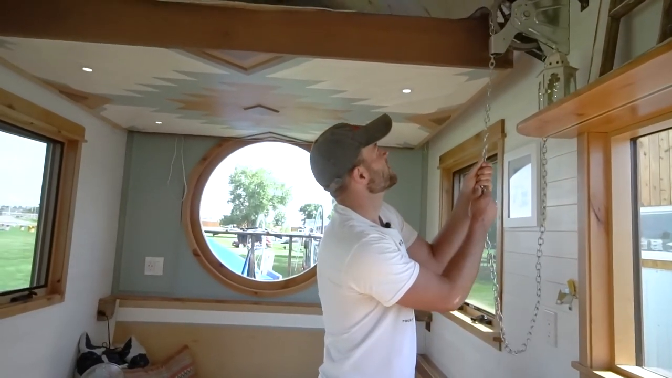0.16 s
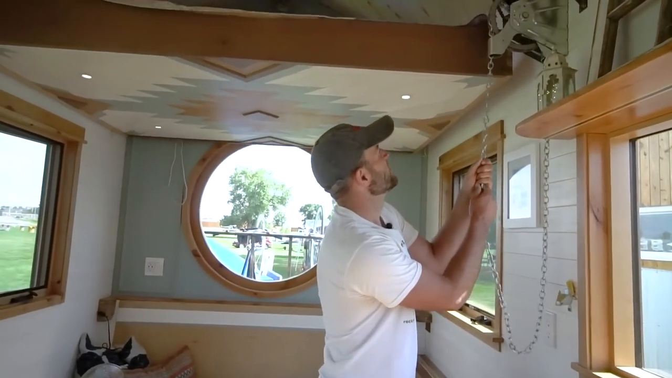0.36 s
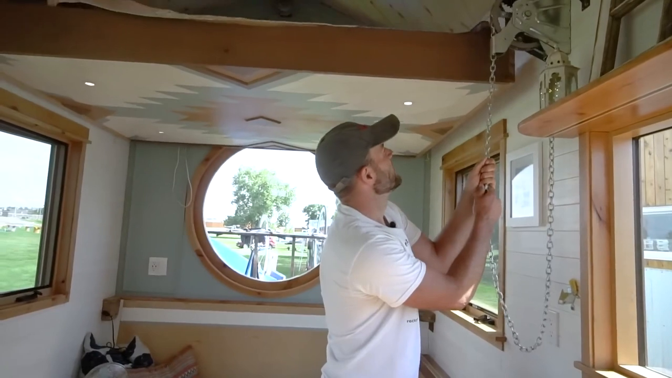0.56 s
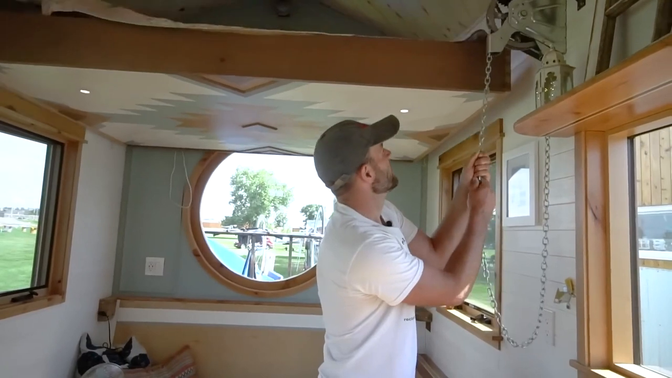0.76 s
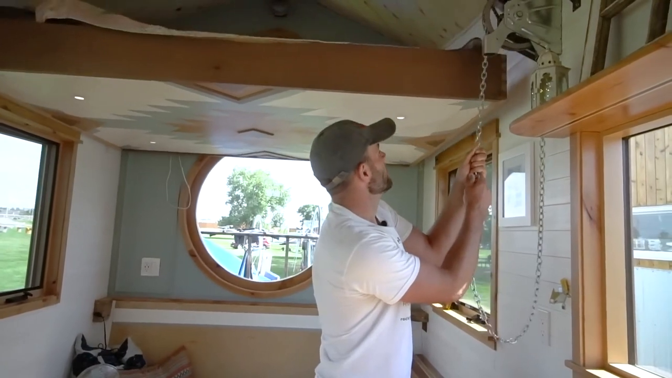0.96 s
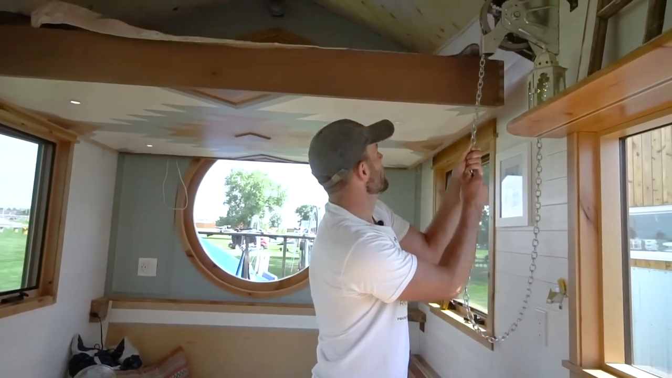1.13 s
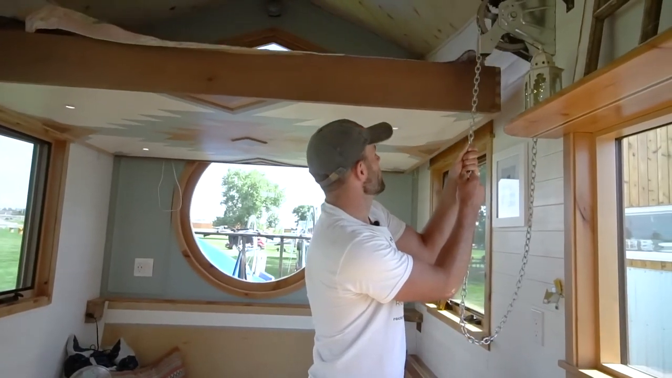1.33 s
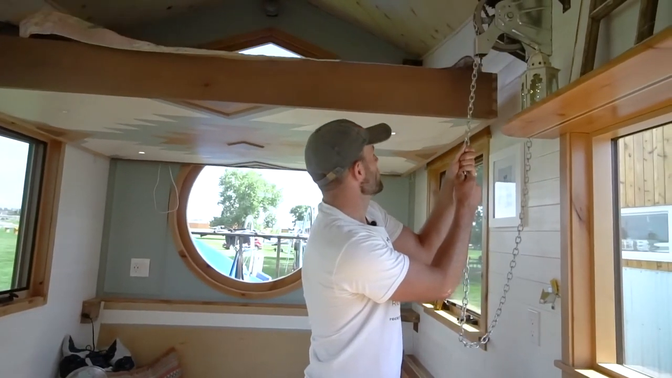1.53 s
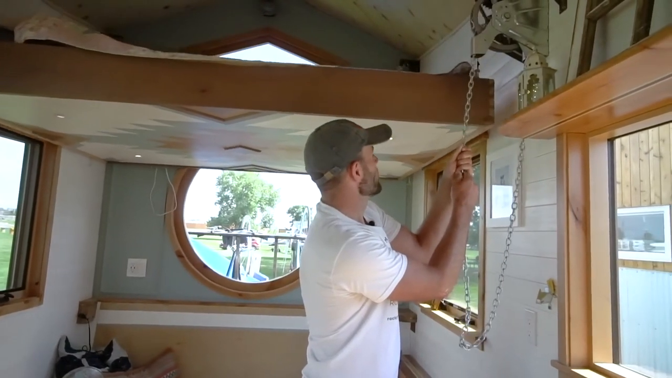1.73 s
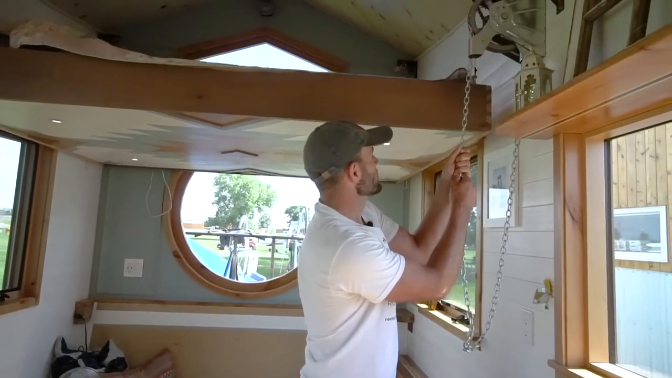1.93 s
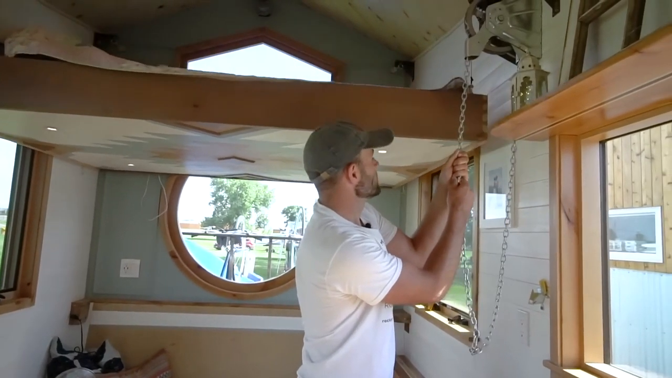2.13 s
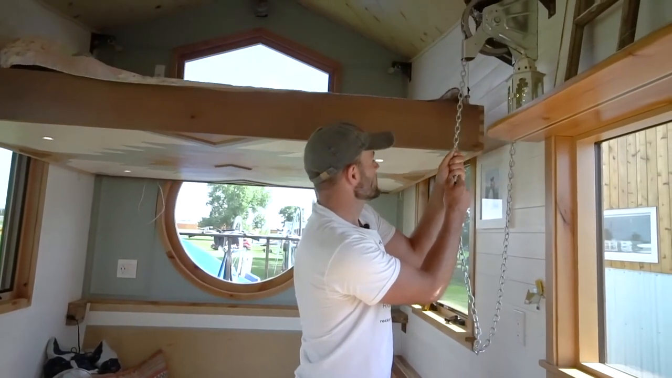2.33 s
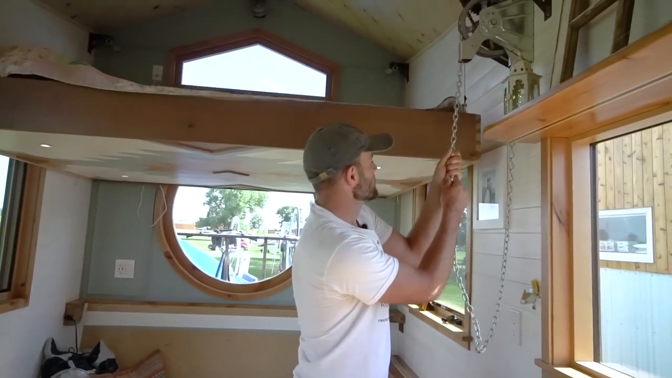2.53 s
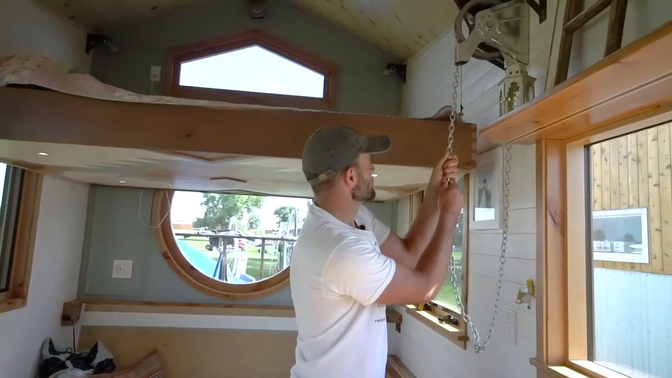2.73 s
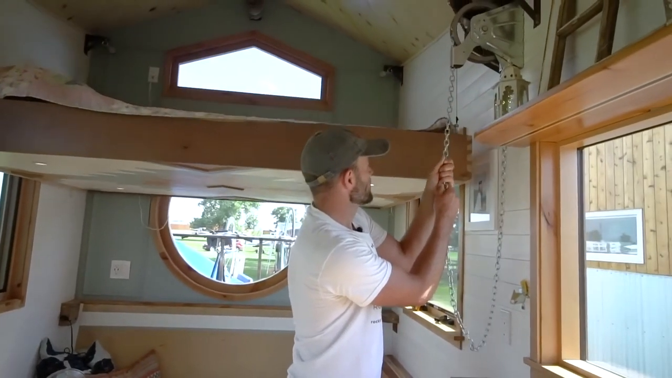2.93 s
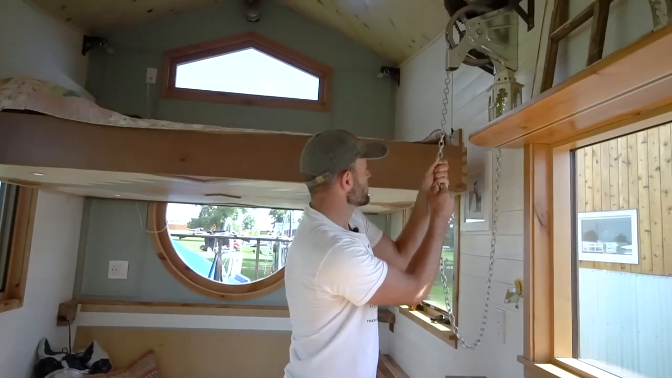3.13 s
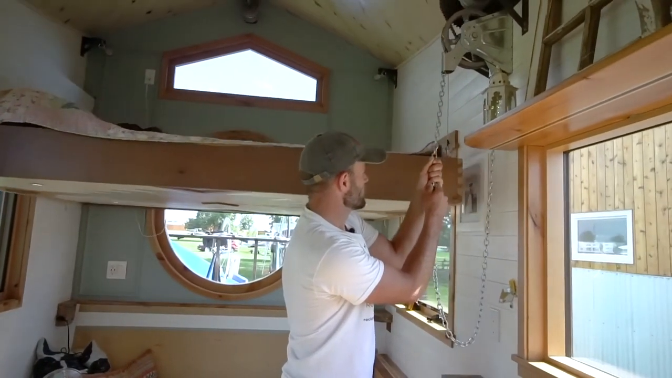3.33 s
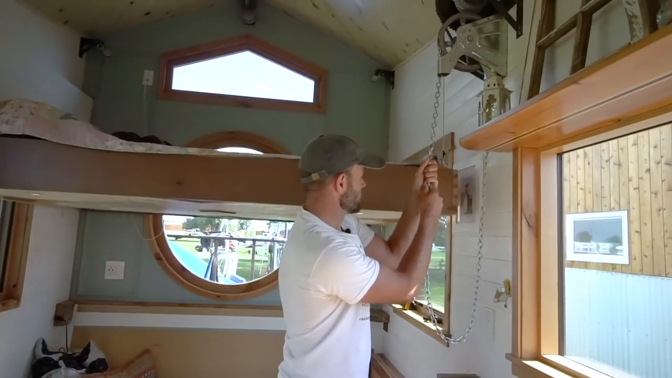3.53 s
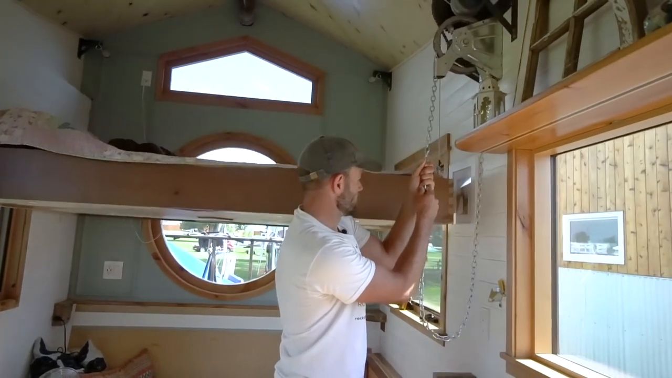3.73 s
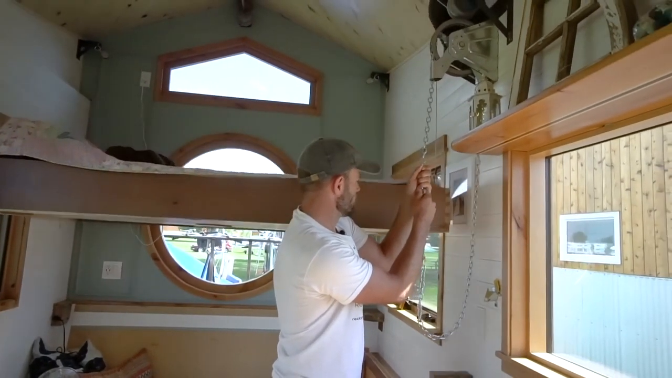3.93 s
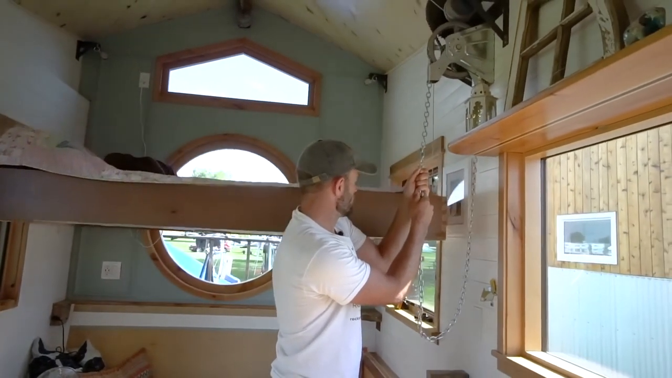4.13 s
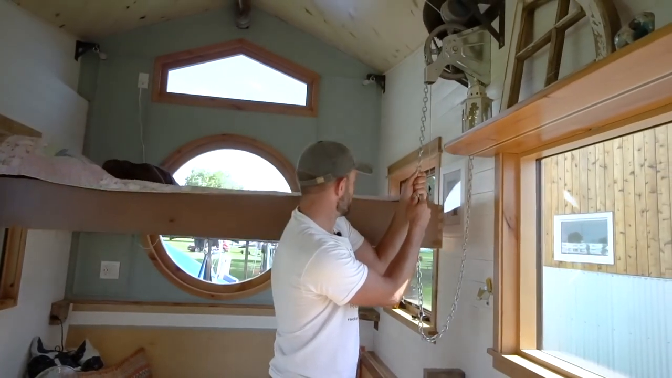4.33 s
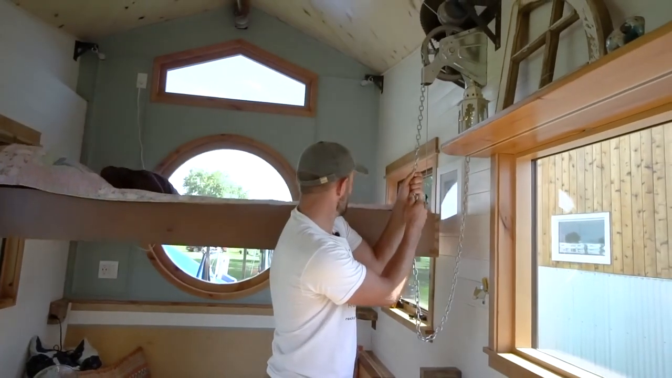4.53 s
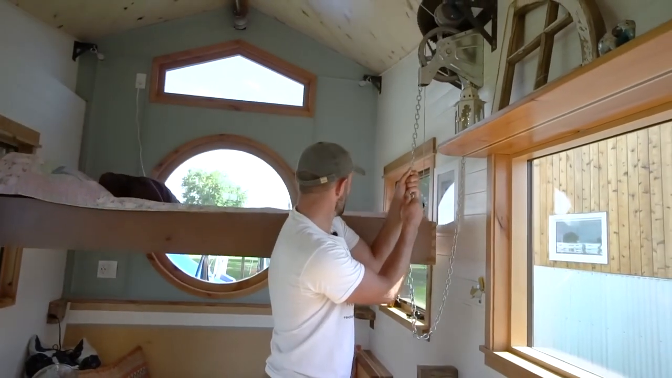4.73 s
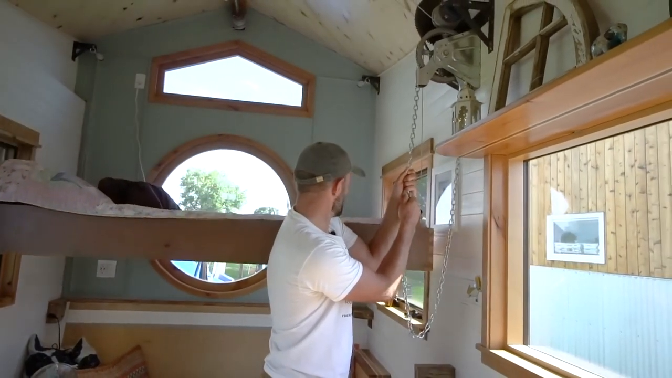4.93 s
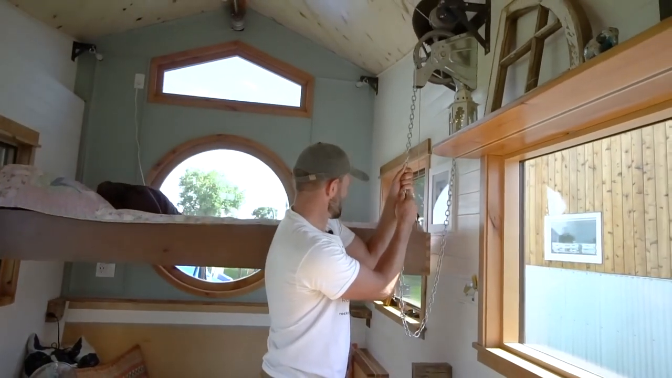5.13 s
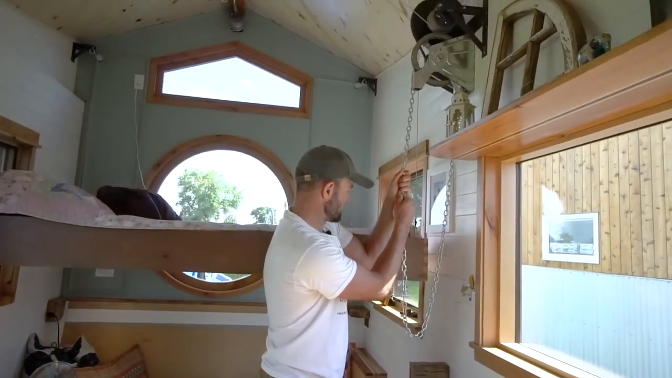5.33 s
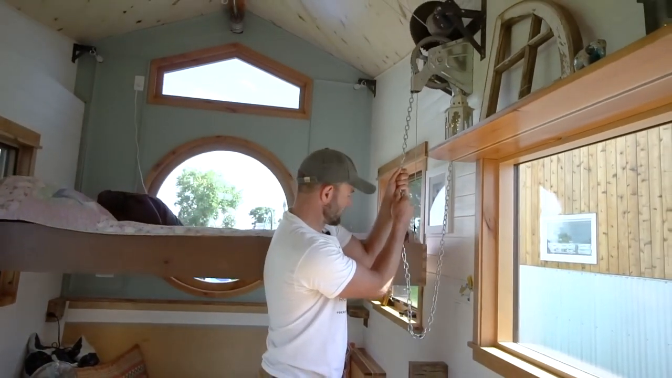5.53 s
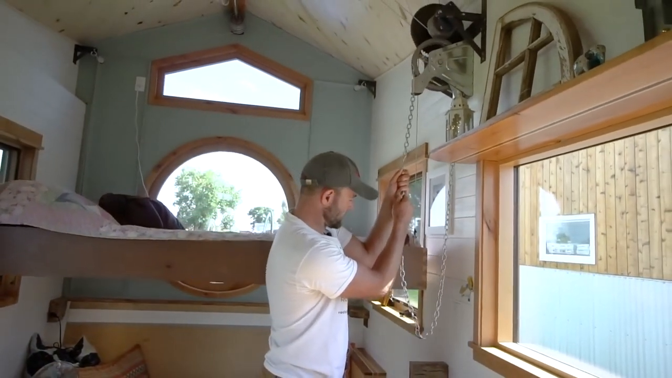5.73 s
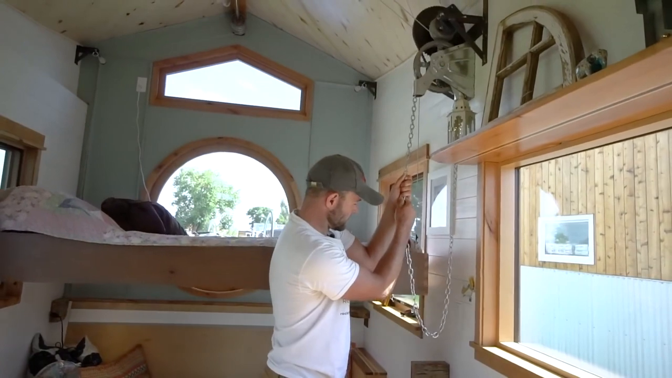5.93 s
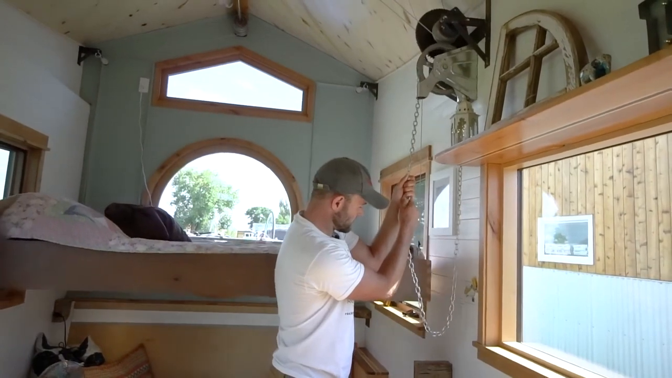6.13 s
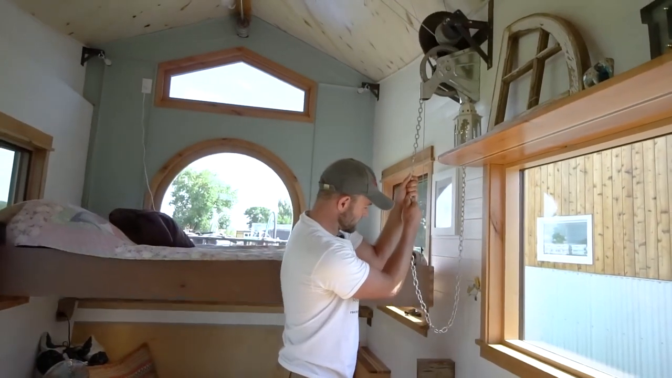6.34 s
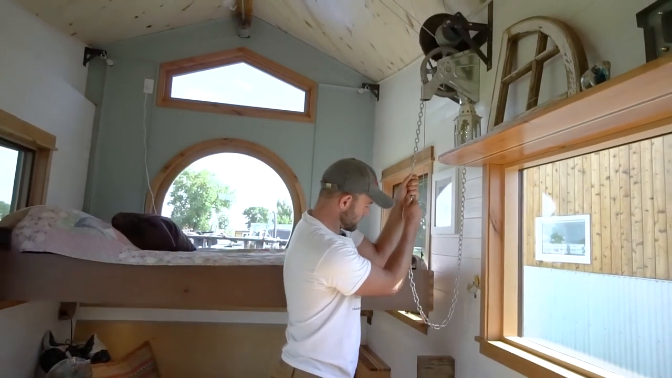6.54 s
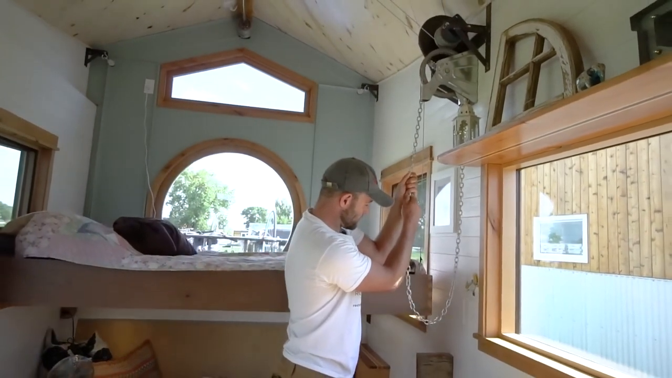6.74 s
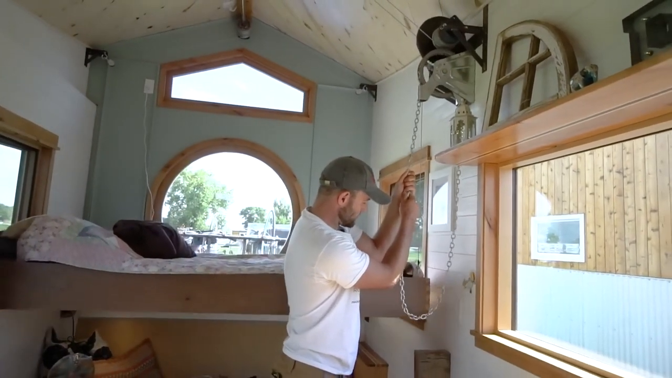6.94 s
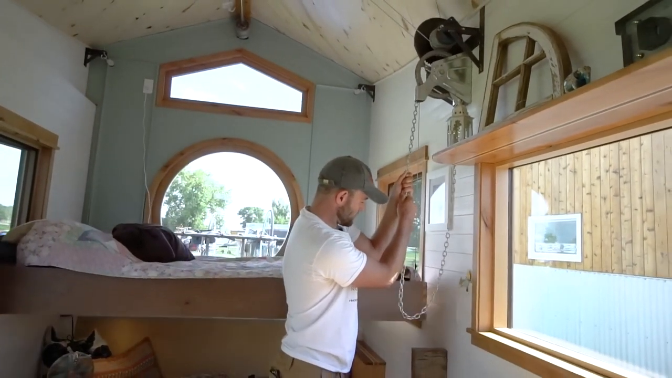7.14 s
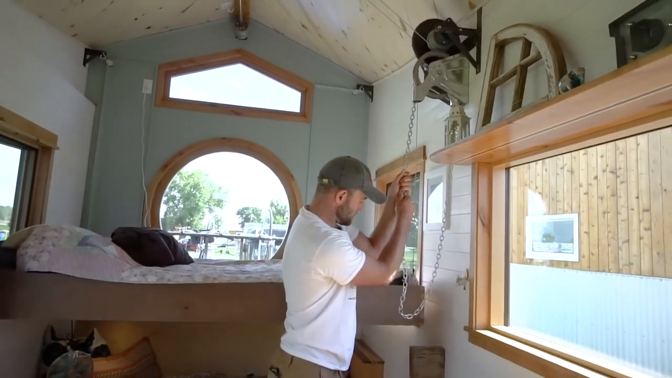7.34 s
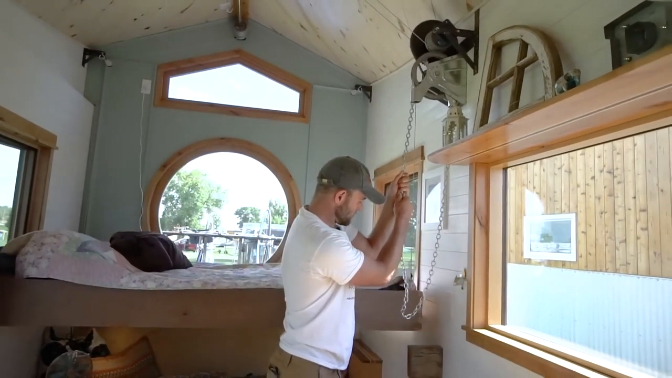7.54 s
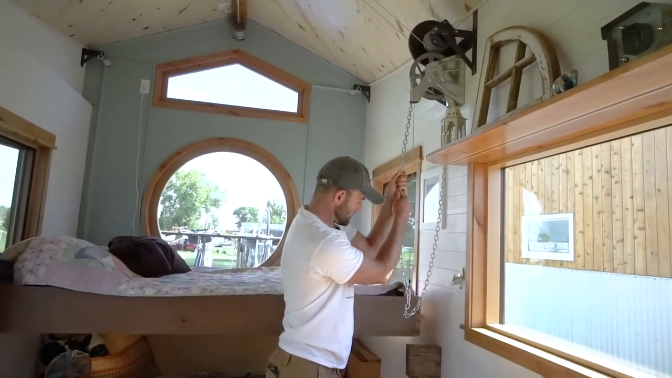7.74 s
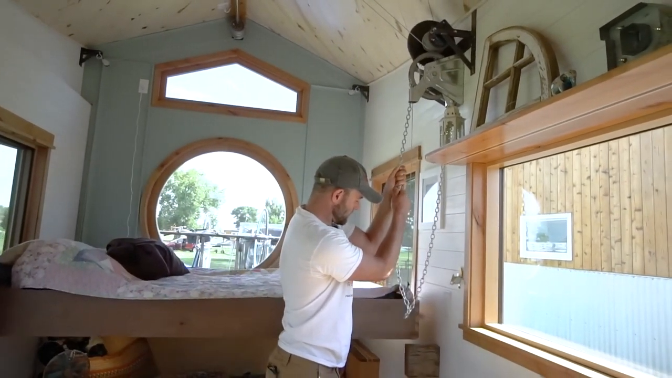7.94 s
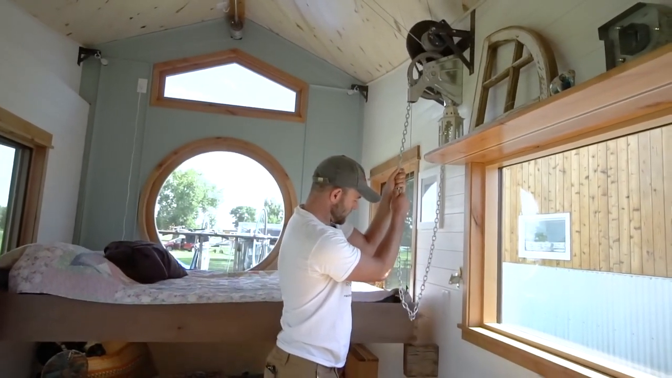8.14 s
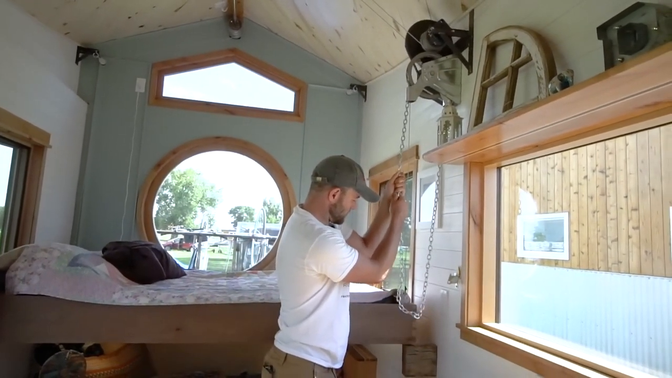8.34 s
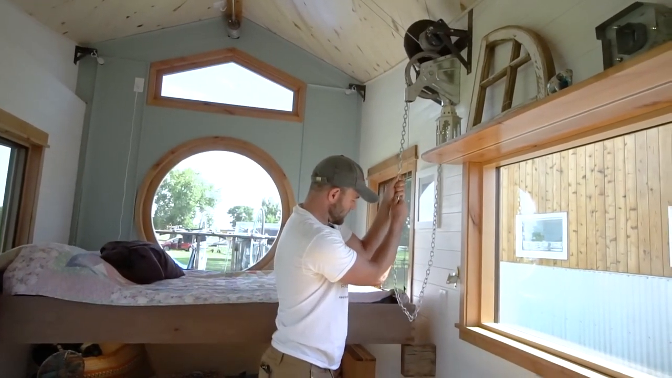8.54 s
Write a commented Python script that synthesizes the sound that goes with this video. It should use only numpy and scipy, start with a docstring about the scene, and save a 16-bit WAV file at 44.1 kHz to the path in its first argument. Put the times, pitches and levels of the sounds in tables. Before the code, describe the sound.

Close, bright metallic ticking of a pawl over a ratchet wheel, quick and uneven, with ringing steel plates and light chain jangle. The pace rises, dips, and rises again. After about four seconds loose chain links rattle densely and dominate, over a low-mid gear drone. The pulling stays continuous but pulses hand over hand. A soft thud precedes the abrupt stop and a short reverberant tail in a small wooden interior.

```python
"""The brake pawl of a hand chain hoist ticks over its ratchet wheel as a heavy load is lowered in a small
wooden room. Each tick is a burst of noise that rings the steel plates and both wheels.
The hand chain clatters with chance knocks, grows much louder midway and covers the ticks; the gear housing
drones from ringing modes. Dull knocks, faint short bursts of deep noise and faint room noise lie beneath.
At the end the hoist stops and the room rings out."""
import sys
import numpy as np
from scipy import signal
from scipy.fft import rfft, irfft, next_fast_len
from scipy.io import wavfile
from scipy.ndimage import uniform_filter1d, minimum_filter1d

SR = 44100
rng = np.random.default_rng(int(sys.argv[2]) if len(sys.argv) > 2 else 0)


def store_pcm(level_fs):
    """Save levels as 16-bit WAV."""
    pcm = np.round(np.clip(level_fs, -1, 1) * 32767).astype(np.int16)
    wavfile.write(sys.argv[1], SR, np.atleast_2d(pcm).T)


N = 382479
TIME = np.arange(N) / SR  # seconds
STOP_S = 8.33  # the hoist stops
# from here the hanging chain starts to swing and clatter, and shakes the housing more
SWING_START_S, SWING_RISE_S = 4.11, 1.3


def pawl(speed, level_db):
    """The pawl slips off each tooth, snaps into the gap and bounces once; the snap rings plates and wheels."""
    # ticks of the slow stretches, heavy or light: (time [s], force [dB])
    slow_ticks = [(0.053, -1), (0.111, -0.5), (0.16, -3), (0.2, -2.5), (0.235, 2.5), (0.263, -2),
                  (0.293, -5), (0.319, 5), (0.345, 0), (0.371, -1.5), (1.798, -3.5), (1.826, 0.5),
                  (1.854, -3), (1.882, -2), (1.911, 2.5), (1.939, 0), (1.966, -1)]
    # dull part of each contact: (frequency [Hz], level per Hz [dB])
    clack_spectrum = [(40, -53), (120, -31), (300, -17), (500, -7.5), (850, -9.5), (1120, -6.5),
                      (1220, -18.5), (1350, -6), (1800, -7), (2400, 0), (3200, -7.5), (4000, -1.5),
                      (5600, -6.5), (7200, -3.5), (7950, -12), (9200, -17.5), (12000, -37.5)]
    # ringing of pawl and steel side plates: (frequency [Hz], width [Hz], level [dB])
    plate_modes = [(1276, 19, -14), (1394, 36, -2), (1476, 20, -7.5), (1656, 29, -15.5), (2250, 240, -9),
                   (2430, 170, -5), (2700, 50, -9.5), (3260, 25, -14), (3843, 62, -0.5), (4345, 45, -2),
                   (4600, 69, -9.5), (4970, 77, -5.5), (5690, 41, -15), (6410, 100, -9), (6860, 98, -2),
                   (6990, 61, 0), (7460, 100, -10), (8720, 67, -3), (10020, 26, -10.5)]
    # bright edge of each tick: (time [s], level [dB])
    edge_curve = [(0, -32), (0.5, -19.5), (1.0, -28), (1.4, -33), (1.9, -25), (2.35, -24), (3.3, -24.5),
                  (4.1, -25.5), (4.8, -35), (5.5, -27), (5.8, -48)]

    teeth_passed = np.floor(np.cumsum(speed) / SR)
    drops = TIME[1:][np.diff(teeth_passed) > 0]
    drops = drops[drops < STOP_S]
    chance = rng.standard_normal((len(drops), 4))
    force_db = 2.37 * chance[:, 0]
    for s, db in slow_ticks:
        nearest = np.argmin(np.abs(drops - s))
        force_db[nearest] = db
    # at speed the pawl has less time to fall, so each tick is lighter
    force = from_db(force_db) / np.sqrt(np.interp(drops, TIME, speed))

    # typical delays after the drop, in seconds; chance varies them
    seats = drops + .0015 * np.exp(.15 * chance[:, 3])
    bounces = drops + .0105 * np.exp(.3 * chance[:, 1])
    bounce_force = force * from_db(-13 + 2.5 * chance[:, 2])
    times = np.r_[drops, seats, bounces]
    sizes = np.r_[force, force * from_db(2), bounce_force]

    clack = coloured(chatter(times, sizes, fade_s=.001), clack_spectrum)
    snap = from_db(-8) * rms_one(band(chatter(seats, force, fade_s=.0004), 1430, 3800))
    plates = from_db(-3) * band(body(seats, force, plate_modes), 780, 8000)

    edge_db, = in_time(edge_curve)
    edge_noise = chatter(np.r_[drops, seats], np.r_[force, force], fade_s=.00055)
    edge = from_db(edge_db) * rms_one(band(edge_noise, 6290, 7660))
    return from_db(level_db) * (clack + snap + plates) + wheels(seats, force) + edge


def wheels(times, sizes):
    """Each snap strikes one mode of each wheel; they ring freely or are damped as the load shifts."""
    # ring of the ratchet wheel: (time [s], level [dB])
    ratchet_curve = [(0, -36), (0.3, -28.5), (1.55, -23), (1.95, -31), (2.25, -24), (2.7, -24.5),
                     (3.2, -20), (3.48, -22), (3.62, -27), (5.2, -32), (5.8, -53)]
    # ring of the hand chain's wheel: (time [s], level [dB])
    chain_wheel_curve = [(0, -29), (0.3, -24), (0.95, -25.5), (1.7, -44), (3.2, -41), (3.9, -23),
                         (5.3, -24), (5.7, -32), (6.5, -25.5), (8.3, -32.5)]
    ratchet_db, = in_time(ratchet_curve)
    chain_wheel_db, = in_time(chain_wheel_curve)
    ratchet = from_db(ratchet_db) * ring(times, sizes, hz=3508, width_hz=67)
    chain_wheel = from_db(chain_wheel_db) * ring(times, sizes, hz=2176, width_hz=80)
    return ratchet + chain_wheel


def hand_chain(speed, level_db, tug_db):
    """Links knock on wheel pockets, guide and each other; until the chain swings, each tooth jolts them."""
    # dull part of each contact: (frequency [Hz], level per Hz [dB])
    clack_spectrum = [(40, -68), (120, -32.5), (300, -17), (480, -10), (850, -11.5), (1100, -4.5),
                      (1450, -5.5), (1800, -3), (2400, -1), (3300, -6), (4300, -5), (5300, -10.5),
                      (7000, -15), (9000, -25), (12000, -43)]
    # ringing of links and chain guide: (frequency [Hz], width [Hz], level [dB])
    link_modes = [(1122, 25, -6), (1273.3, 12, 0), (1353, 23, -4), (1406, 35, -3), (1480, 30, -5.5),
                  (1859, 28, -5.5), (2222, 82, -2), (2376, 45, 0), (2665, 40, -6), (2806, 36, -5.5),
                  (2965, 48, -13), (3150, 20, -11), (3598, 80, 1), (3780, 100, -3), (4324, 31, -2.5),
                  (4480, 62, -6), (5140, 110, -13), (6470, 39, -10.5), (7080, 60, -8), (7640, 23, -12),
                  (8600, 30, -15)]
    jolt_db, jolt_teeth = 7, .22  # strength, and fading time as a share of one tooth
    treble_hz, treble_share = 3500, .83

    times, sizes = random_contacts(8 * speed, spread_db=2.5)  # eight contacts per tooth
    clack = coloured(chatter(times, sizes, fade_s=.001), clack_spectrum)
    ringing = band(body(times, sizes, link_modes), 1030, 9900)
    links = clack + from_db(-4) * ringing

    since_tooth = np.cumsum(speed) / SR % 1
    jolt = np.exp(-since_tooth / jolt_teeth) - jolt_teeth
    links = links * from_db(jolt_db * jolt * (1 - swing()))

    # harder knocks are brighter: the treble takes an extra share of each tug
    dull = signal.sosfilt(signal.butter(1, treble_hz, fs=SR, output="sos"), links)
    treble = from_db(treble_share * tug_db) * (links - dull)
    return from_db(level_db) * (dull + treble) + jangles(links)


def jangles(links):
    """Loose links jangle for a moment: one frequency band of the link sound swells and fades each time."""
    # moments of jangling: (middle [s], length [s], level [dB], centre frequency [Hz])
    jangle_moments = [(0.31, 0.59, -31.5, 1900), (0.802, 1.5, -34, 3840), (1.293, 0.67, -30, 2680),
                      (1.656, 0.25, -27, 2710), (2.2, 1, -33, 2600), (3.897, 1.2, -38, 1140),
                      (4.558, 0.36, -24.5, 4400), (4.953, 0.77, -25.5, 4540)]
    half = 2 ** (.69 / 2)  # each band is 0.69 octave wide
    total = 0
    for s, length_s, db, hz in jangle_moments:
        register = rms_one(band(links, hz / half, hz * half))
        total = total + from_db(db) * swell(s, length_s) * register
    return total


def housing(speed):
    """Gear teeth knock under the load and keep the housing's modes droning."""
    # ringing of the gear housing: (frequency [Hz], width [Hz], level [dB])
    housing_modes = [(332.6, 21, -15), (434, 28, -12.5), (478, 25, -15.5), (527.8, 12, -1.5),
                     (560, 23, -0.5), (585.5, 20, -2), (639, 15, -2.5)]
    times, sizes = random_contacts(5 * speed, spread_db=1.5)  # five contacts per tooth
    return rms_one(band(body(times, sizes, housing_modes), 194, 910))


def load_knocks():
    """The load knocks dully against the wall and the stops: short bursts of low noise."""
    # knocks: (time [s], level [dB])
    knock_times = [(5.365, -34), (8.24, -26)]
    return noise_bursts(knock_times, 200, 380, fade_s=.012)


def overload_bursts():
    """Faint short bursts of deep noise, as from an overloaded recorder."""
    # bursts: (time [s], level [dB])
    burst_times = [(0.25, -46), (0.315, -44), (0.645, -45), (0.71, -45), (1.485, -48), (1.815, -42),
                   (2.87, -45), (4.575, -49), (6.165, -43), (7.255, -46)]
    return noise_bursts(burst_times, 30, 105, fade_s=.0073)


def still_air():
    """Faint steady noise of the still room."""
    # colour of the noise: (frequency [Hz], level per Hz [dB])
    air_spectrum = [(24, -64), (40, -30), (300, -3), (380, 2), (560, 1), (720, -4), (1720, -4.5),
                    (2600, -11), (5560, -17), (7040, -21), (11000, -53), (14300, -76)]
    return from_db(-45.5) * coloured(rng.standard_normal(N), air_spectrum)


def room(x, wet_db):
    """The microphone sways with the pulling, so the echoes fade from one pattern into the next."""
    patterns, changes_per_s = 4, 2.5
    echoes = 0
    for k in range(patterns):
        away = np.abs((changes_per_s * TIME + k) % patterns - patterns / 2)
        share = np.cos(np.pi / 2 * np.minimum(away, 1))
        echoes = echoes + signal.oaconvolve(x * share, wall_tail())[:N]
    return x + from_db(wet_db) * echoes


def wall_tail():
    """Dense echoes from the near wooden walls: fading noise bands, shortest at the top; unit energy."""
    # time for the echoes to fall by 60 dB: (frequency [Hz], time [s])
    fade_times = [(200, 0.38), (2000, 0.35), (5000, 0.48), (10000, 0.18)]
    t = TIME[:SR // 2]
    edges = np.geomspace(80, 16000, 9)  # Hz
    tail = 0
    for low, high in zip(edges, edges[1:]):
        t60 = at_hz(fade_times, np.sqrt(low * high))
        tail = tail + band(rng.standard_normal(len(t)), low, high) * from_db(-60 * t / t60)
    tail = tail * (t > .004)  # the first echo needs 4 ms
    return tail / np.linalg.norm(tail)


def random_contacts(per_s, spread_db):
    """Times and sizes of chance contacts while the hoist runs; the fewer, the heavier."""
    met = (rng.random(N) < per_s / SR) & (TIME < STOP_S)
    chance = np.clip(rng.standard_normal(met.sum()), -2, 2)
    return TIME[met], from_db(spread_db * chance) / np.sqrt(per_s[met])


def strikes(times, sizes):
    """A one-sample click of each size at each time."""
    return np.bincount(np.clip(times * SR, 0, N).astype(int), sizes, N + 1)[:N]


def chatter(times, sizes, fade_s):
    """Steel on steel: each contact is a burst of noise that swells quickly and dies away; rms 1."""
    r = np.exp(-1 / (fade_s * SR))
    power = signal.lfilter([1], [1, -2 * r, r * r], strikes(times, sizes ** 2) + 1e-18)
    return rms_one(np.sqrt(np.abs(power)) * rng.standard_normal(N))


def ring(times, sizes, hz, width_hz):
    """One mode, struck with a new strength and sign by every contact and kept ringing evenly; rms 1."""
    r = np.exp(-np.pi * width_hz / SR)
    signs = rng.choice([-1, 1], len(times))
    blows = strikes(times, sizes * signs * rng.uniform(.68, 1, len(times)))
    resonance = [1, -2 * r * np.cos(2 * np.pi * hz / SR), r * r]
    return steadied(signal.lfilter([1, 0, -1], resonance, blows + 1e-18))


def steadied(x, window_s=.14):
    """Hold the running level of a ring even, from stroke to stroke, until the hoist stops; rms 1."""
    size = max(int(window_s * SR), 1)
    power = uniform_filter1d(uniform_filter1d(x ** 2, size), size // 2 + 1)
    last = int((STOP_S - window_s / 2) * SR)
    # after the stop the last correction is kept, so the ring can die away
    held_power = np.abs(power[np.minimum(np.arange(N), last)])
    return rms_one(x / np.sqrt(held_power + np.mean(power) / 20))


def body(times, sizes, modes):
    """All modes of a part together; rms 1."""
    return rms_one(sum(from_db(db) * ring(times, sizes, hz, width) for hz, width, db in modes))


def noise_bursts(table, low_hz, high_hz, fade_s):
    """Short bursts of noise in one band, each starting at once and dying away."""
    envelope = sum(from_db(db) * (TIME > s) * np.exp(-np.abs(TIME - s) / fade_s) for s, db in table)
    noise = rms_one(band(rng.standard_normal(N), low_hz, high_hz))
    return band(envelope * noise, low_hz, high_hz)


def coloured(x, spectrum):
    """Causal (minimum-phase) filter with the given spectrum; rms 1."""
    size = 2 * next_fast_len(N)
    hz = np.arange(size // 2 + 1) * SR / size
    cepstrum = irfft(np.log(from_db(at_hz(spectrum, hz))))
    cepstrum[size // 2:] = 0  # keeping one half makes the filter act only after each sound
    return rms_one(irfft(rfft(x, size) * np.exp(2 * rfft(cepstrum)))[:N])


def band(x, low_hz, high_hz):
    """Keep one frequency band."""
    return signal.sosfilt(signal.butter(2, [low_hz, min(high_hz, SR / 2 - 1)], "band", fs=SR, output="sos"), x)


def swell(middle_s, length_s):
    """A smooth rise from 0 to 1 and back."""
    return np.cos(np.pi * np.clip((TIME - middle_s) / length_s, -.5, .5)) ** 2


def ramp(start_s, length_s):
    """A straight rise from 0 to 1 that stays there."""
    return np.clip((TIME - start_s) / length_s, 0, 1)


def swing():
    """How far the chain's swinging has built up, from 0 to 1."""
    return ramp(SWING_START_S, SWING_RISE_S)


def in_time(rows):
    """Each column of a curve at every sample."""
    s, *columns = np.transpose(rows)
    return [np.interp(TIME, s, c) for c in columns]


def at_hz(points, hz):
    """Read a table on a log-frequency axis."""
    known_hz, values = np.transpose(points)
    return np.interp(np.log(hz + 1), np.log(known_hz), values)


def from_db(db):
    """Decibels to gain."""
    return 10 ** (np.asarray(db) / 20)


def rms_one(x):
    """Scale to unit power."""
    return x / np.sqrt(np.mean(x ** 2) + 1e-20)


def scene():
    """Pawl, chain and housing follow the speed and the tugs; they sound in the room, over its faint noise."""
    # turning of the ratchet wheel: (time [s], speed [teeth per s])
    speed_curve = [(0.0, 19.81), (0.09, 16.26), (0.29, 36.93), (0.44, 42.31), (0.7, 63.11), (0.98, 47.25),
                   (1.34, 37.05), (1.7, 37.01), (1.9, 34.02), (2.31, 64.32), (2.62, 45.85), (3.06, 64.0),
                   (3.29, 66.88), (3.72, 55.04), (4.19, 53.66), (4.6, 63.39), (5.2, 35), (5.5, 35),
                   (5.8, 29), (6.0, 48), (7.6, 43), (8.0, 33), (8.3, 42)]
    # hand-over-hand tugs, and the slack between them:
    # (middle [s], length [s], change of housing drone [dB], change of rattle [dB])
    tugs = [(0.23, 0.15, 9, 2.5), (0.504, 0.4, 4, 3), (0.685, 0.25, 5, 0.5), (0.963, 0.4, 4, 2),
            (1.25, 0.21, 4.5, 4), (1.62, 0.46, 2.5, 3), (1.854, 0.11, -2, 1), (2.175, 0.17, -2, -2.5),
            (2.39, 0.12, 2, -0.5), (2.5, 0.15, -2, -4), (2.956, 0.83, -2, -1), (3.42, 0.4, 3.5, 0),
            (3.827, 0.65, 4.5, 2.5), (3.99, 0.14, -6.5, -1.5), (4.11, 0.2, 7.5, 2.5),
            (4.442, 0.23, 0, -3.5), (4.818, 0.21, -0.5, -2.5), (5.076, 0.32, 3, 1), (5.295, 0.16, -4, 0),
            (5.438, 0.67, 2, -0.5), (5.752, 0.43, -2, -3), (5.965, 0.13, 4, 1), (6.2, 0.31, 2, 1),
            (6.47, 0.41, 2, 0), (6.854, 0.36, 2, 0), (7.438, 0.26, 2, 1.2), (7.614, 0.15, -2.5, 1),
            (7.815, 0.24, 3, -0.5), (7.995, 0.22, 0, -1), (8.225, 0.32, 2.5, 2)]

    speed, = in_time(speed_curve)
    doublings = np.log2(speed / 50)  # from the usual 50 teeth per second
    strain_db, rattle_db = sum(np.outer(dbs, swell(s, length_s)) for s, length_s, *dbs in tugs)

    # base level, plus a rise with each doubling of speed
    pawl_db = -18.5 + 3.5 * doublings + rattle_db
    # the ticks grow fainter as the load nears the bottom
    pawl_db = pawl_db - 14.5 * ramp(4.5, 2.75)
    chain_db = -29.5 + 1.5 * doublings + rattle_db + 12 * swing()
    housing_db = -26.5 + 3 * doublings + strain_db + 3.5 * swing()

    ticks = room(pawl(speed, pawl_db), wet_db=-5)
    clatter = room(hand_chain(speed, chain_db, rattle_db), wet_db=-1)
    drone = from_db(housing_db) * steadied(room(housing(speed), wet_db=-6), window_s=.097)
    dull_knocks = room(load_knocks(), wet_db=-5)
    return (ticks + clatter + drone + dull_knocks + overload_bursts() + still_air())[None]


def record(dry):
    """A fast limiter holds the peaks down; then the highest treble is cut."""
    ceiling, release_db_per_s, cutoff_hz = .89, 600, 12100
    over_db = 20 * np.log10(np.maximum(np.abs(dry[0]) / ceiling, 1))
    # after a peak the reduction lets go at a steady rate
    release_db = release_db_per_s * TIME
    held_db = np.maximum.accumulate(over_db + release_db) - release_db
    # about 1 ms of smoothing, starting just ahead of each peak
    gain_db = uniform_filter1d(minimum_filter1d(-held_db, size=45), size=45)
    top_cut = signal.ellip(10, .2, 70, cutoff_hz, fs=SR, output="sos")
    return signal.sosfilt(top_cut, dry * from_db(gain_db))


dry = scene()
out = record(dry)
store_pcm(out)
```